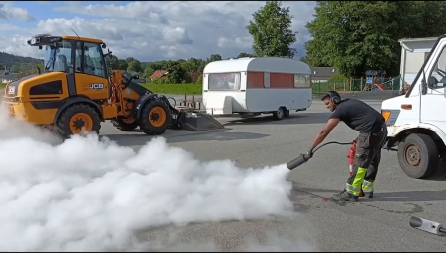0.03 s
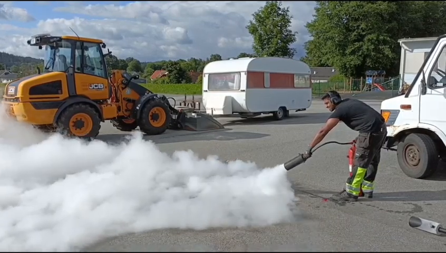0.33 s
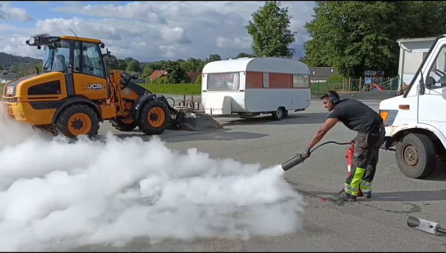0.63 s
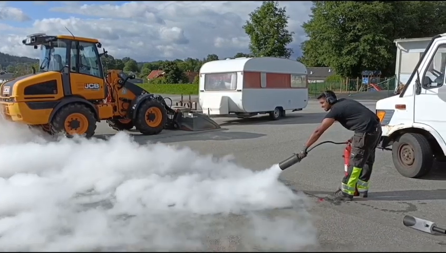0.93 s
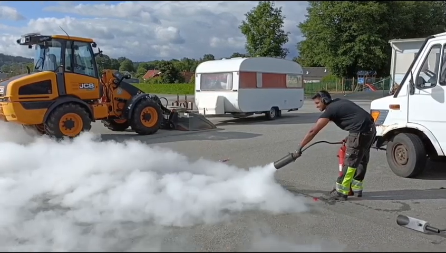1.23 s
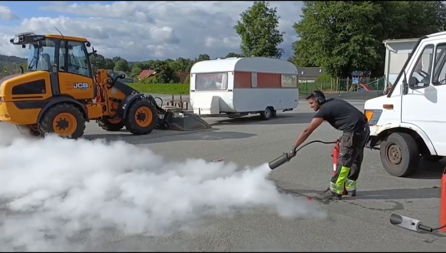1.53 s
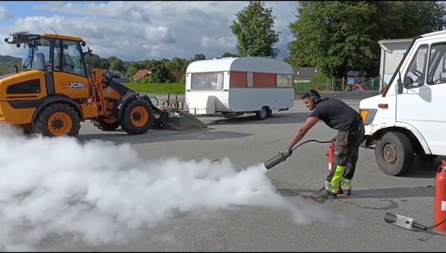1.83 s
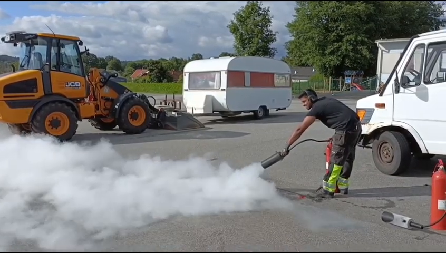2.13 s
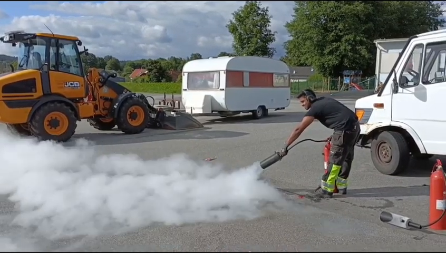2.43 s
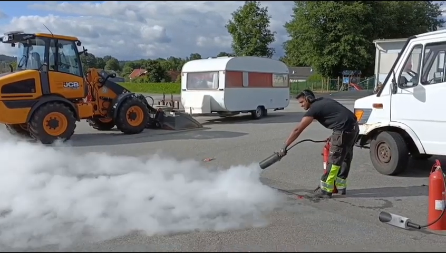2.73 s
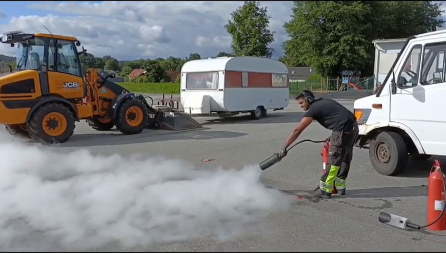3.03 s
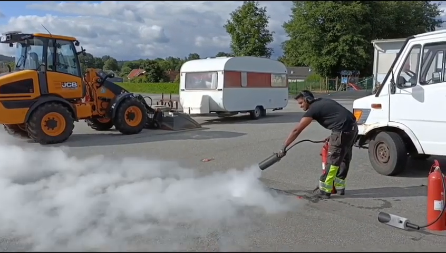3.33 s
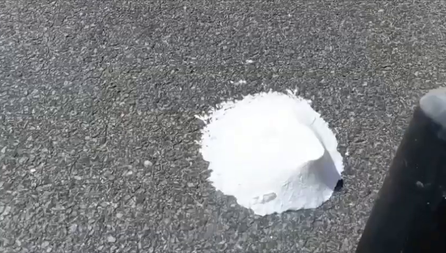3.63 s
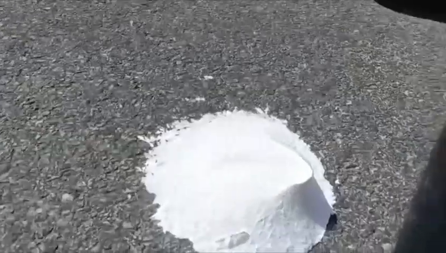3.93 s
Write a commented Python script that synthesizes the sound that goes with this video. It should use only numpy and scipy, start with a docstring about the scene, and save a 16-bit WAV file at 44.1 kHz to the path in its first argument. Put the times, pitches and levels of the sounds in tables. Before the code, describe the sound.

A fire extinguisher blasts gas from the start, a loud steady hiss a few metres away on an outdoor paved lot. Its low roar gradually fades while the hiss turns shriller. Brief whistles and screeches come near 0.8 seconds and between 1.5 and 2.5 seconds. At about 3.6 seconds the blast cuts off. A soft bump follows at 3.7 seconds, then faint air and wind on the microphone.

```python
"""On a paved lot, a carbon dioxide fire extinguisher blasts gas through its horn a few metres away. The
swirling gas makes a low roar that fades, while most of the horn's resonances rise and grow stronger. The nozzle
adds a shrill band near 5 kHz, screeches and brief whistles; hard surfaces echo it all. The sound stops
abruptly. After a short silence come a soft bump and quiet air with a little wind."""
import sys
import numpy as np
from scipy import signal
from scipy.fft import rfft, irfft, next_fast_len
from scipy.io import wavfile
from scipy.ndimage import map_coordinates

SR = 44100
rng = np.random.default_rng(int(sys.argv[2]) if len(sys.argv) > 2 else 0)


def persist_wave(psi):
    """Save psi, clipped to +-1, as 16-bit WAV."""
    counts = np.round(np.clip(psi, -1, 1) * 32767).astype(np.int16)
    wavfile.write(sys.argv[1], SR, np.atleast_2d(counts).T)


N = 176400
STOP_S = 3.633  # the sound stops abruptly here


def amp(db):
    """Turn decibels into a gain."""
    return 10 ** (np.asarray(db) / 20)


def along(points, hz):
    """Read between (pitch_hz, value) points on a log pitch scale."""
    pitches, values = np.transpose(points)
    return np.interp(np.log(hz + 1), np.log(pitches + 1), values)


def clock():
    """The time of each sample in seconds."""
    return np.arange(N) / SR


def level(points):
    """A gain for each sample from (time_s, level_db) points."""
    return amp(np.interp(clock(), *np.transpose(points)))


def bell(distance, width):
    """A smooth hump of height 1 and the given width at half height."""
    return .5 ** ((2 * distance / width) ** 2)


def decay(t, fade_s):
    """A fall of 60 dB in fade_s seconds, silent before t = 0."""
    return (t >= 0) * np.exp(-np.log(1000) * np.maximum(t, 0) / fade_s)


def wobble(per_s):
    """A smooth curve through per_s random values a second."""
    return map_coordinates(rng.standard_normal(N // 10), [clock() * per_s], mode="wrap")


# How two microphones hear each pitch: pitch_hz, left_minus_right_db, likeness (0 to 1), left_lead_rad
STEREO = [(40, -4.5, .5, 2), (110, -3.5, 0.9, 0.2), (180, 1, 1, -0.12), (381, -4, 0.8, -0.37),
          (586, 0, 0.7, -0.24), (756, 9, 0.08, 0.4), (893, -3.5, 0.23, 0.7), (1300, 0, .85, 0.43),
          (1610, -2.5, 0.8, -0.4), (2050, -2.5, 0.83, -0.56), (2600, -3, 0.4, 0), (3080, 5, 0.2, -.8),
          (3570, 1, 0.4, 1.5), (4600, -5.5, 1, 1.3), (5160, -4.5, 0.7, 1.5), (5700, -2, 0.3, -0.3),
          (6450, 6, 0.2, -2.5), (7600, 3.5, 0.2, 0.9), (8800, -7, 0, -0.2), (10500, -1, 0, -0.034),
          (15000, -2.5, .05, 0)]
def stereo(hz):
    """Balance, likeness and phase lead between left and right at a pitch."""
    return [along(np.array(STEREO)[:, [0, column]], hz) for column in (1, 2, 3)]


def noise(colour, crackle=0):
    """Steady stereo noise; colour(hz, s), in dB, shapes its tone but not its level."""
    white = rng.standard_normal((2, N))
    white[0] = (white[0] + crackle) / np.sqrt(1 + np.mean(np.square(crackle)))
    frames = dict(nperseg=4096, noverlap=3072)
    hz, s, (common, apart) = signal.stft(white, SR, **frames)
    hz = hz[:, None]
    gain = amp(colour(hz, s))
    gain /= np.sqrt(np.mean(gain ** 2, axis=0))
    pan_db, likeness, lead = stereo(hz)
    turn = np.arccos(np.clip(likeness, 0, 1)) / 2
    mid, side = np.cos(turn) * common, np.sin(turn) * apart
    left = amp(pan_db / 2) * np.exp(1j * lead / 2)
    pair = np.array([(mid + side) * left, (mid - side) / left])
    mono_level = np.hypot(np.cos(turn) * abs(left + 1 / left), np.sin(turn) * abs(left - 1 / left)) / 2
    return signal.istft(pair * gain / mono_level, SR, **frames)[1][:, :N]


# Loudness of the outdoor air and of the wind: time_s, level_db
AIR_LEVEL = [(3.72, -67), (3.8, -67), (3.92, -63), (4.0, -60)]
WIND_LEVEL = [(3.72, -61), (3.75, -59), (3.775, -65), (3.82, -60.5), (3.86, -55), (3.9, -55), (3.95, -64),
              (4.0, -66)]
# Tone of each: pitch_hz, relative_db
AIR_TONE = [(88, -30), (150, -5), (409, -6), (818, -11), (1030, -14), (1490, -14.5), (4210, -22.5),
            (14200, -29), (15000, -22)]
WIND_TONE = [(25, -14), (55, 7), (110, 3), (170, -18), (300, -14), (900, -60)]
def air_and_wind(start_s=3.715, fade_in_s=.006):
    """Faint outdoor air, with wind rumbling on the microphones."""
    air = level(AIR_LEVEL) * noise(lambda hz, s: along(AIR_TONE, hz))
    wind = level(WIND_LEVEL) * noise(lambda hz, s: along(WIND_TONE, hz))
    return (air + wind) * np.clip((clock() - start_s) / fade_in_s, 0, 1)


# Tone of the bump: pitch_hz, relative_db
BUMP_TONE = [(60, -8), (200, 2), (600, 6), (1100, -8), (1900, -3), (2700, -26), (5000, -42), (10000, -48)]
def bump(start_s=3.729, thud_s=3.743, thud_hz=122):
    """A hand bumps the case that holds the microphones, and it answers with a low thud."""
    knock = amp(-47) * decay(clock() - start_s, fade_s=.053) * noise(lambda hz, s: along(BUMP_TONE, hz))
    t = clock() - thud_s
    thud = amp(-45) * decay(t, fade_s=.1) * np.sin(2 * np.pi * thud_hz * t)
    return knock + thud


# Echoes off parked vehicles and the ground: left_delay_s, right_delay_s, relative_db
ECHOES = [(.0061, 0.0053, -18.5), (.0098, 0.0078, -25), (0.019, 0.02, -16.5), (0.0187, 0.023, -15),
          (.0243, 0.018, -22), (0.033, 0.042, -23)]
def add_echoes(sound):
    """Hard surfaces send back weak, late copies of the sound."""
    total = sound.copy()
    for *delays, db in ECHOES:
        for side, delay_s in enumerate(delays):
            total[side] += amp(db) * np.roll(sound[side], round(delay_s * SR))
    return total


# Loudness of the nozzle's ring: time_s, level_db
RING_LEVEL = [(0, -38), (.16, -33.5), (.55, -31), (.72, -29), (.86, -28), (.98, -34), (1.4, -45),
              (1.57, -31.5), (1.75, -42), (2.05, -34), (2.4, -30), (2.6, -39.5), (3.0, -41.5), (3.2, -31),
              (3.4, -37.5), (3.6, -42.5)]
# Its tone: pitch_hz, relative_db
RING_TONE = [(2400, -44), (2900, -16.5), (3050, 1), (3220, 1), (3400, -9), (3750, -19), (4400, -45.5)]
def ring():
    """The nozzle rings raggedly near 3.1 kHz."""
    return level(RING_LEVEL) * noise(lambda hz, s: along(RING_TONE, hz))


# Rough screeches: peak_s, length_s, pitch_hz, width_hz, level_db
SCREECHES = [(1.52, .22, 4980, 330, -32), (1.75, .12, 5050, 280, -30), (2.24, .2, 5100, 450, -27),
             (2.42, .4, 2100, 100, -32)]
def screeches():
    """Narrow bands of noise swell for a moment at the nozzle's resonances."""
    total = 0
    for peak_s, length_s, pitch_hz, width_hz, db in SCREECHES:
        band = noise(lambda hz, s: -20 * np.log10(1 + (2 * (hz - pitch_hz) / width_hz) ** 2))
        total += amp(db) * bell(clock() - peak_s, length_s) * band
    return total


def ragged_tone(hz, jitter_hz=48, flutter_db=2.8, wobbles_per_s=400):
    """A stereo tone that trembles in pitch and strength."""
    phase = 2 * np.pi * np.cumsum(hz + jitter_hz * wobble(wobbles_per_s)) / SR
    pan_db, _, lead = stereo(hz)
    pair = np.array([amp(side * pan_db) * np.sin(phase + side * lead) for side in (.5, -.5)])
    pair *= amp(flutter_db * wobble(wobbles_per_s))
    return pair / pair.mean(axis=0).std()


# Brief whistles: peak_s, length_s, pitch_hz, glide_hz_per_s, level_db
WHISTLES = [(.175, 0.057, 3070, -1200, -32), (.825, .09, 3040, -900, -28.5), (1.73, .06, 5100, 900, -29),
            (2.155, 0.032, 5097, -2000, -24), (2.195, .06, 4860, 0.5, -21), (2.242, .06, 5190, -900, -23.5),
            (2.302, 0.026, 4985, 3998.5, -23.5), (2.359, 0.022, 5340, 4000, -26),
            (2.482, 0.037, 4950, 6498.5, -27.5)]
def whistles():
    """The nozzle locks onto one gliding pitch for a moment, then hops to the next."""
    t = clock()
    peak_s, length_s, hz, glide, db = np.transpose(WHISTLES)
    gains = amp(db)[:, None] * bell(t - peak_s[:, None], length_s[:, None])
    loudest = gains.argmax(axis=0)
    from_peak_s = np.clip(t - peak_s[loudest], -length_s[loudest], length_s[loudest])
    return gains.max(axis=0) * ragged_tone(hz[loudest] + glide[loudest] * from_peak_s)


# Pitches the horn and nozzle favour: start_hz, end_hz, width_hz, start_boost_db, end_boost_db
RESONANCES = [(159.4, 195, 19, 15, 12), (504, 574.5, 62, 7, 18), (848, 939, 57, 6.5, 16),
              (1213, 1310, 210, 10.5, 0.5), (1366, 1438, 70, 5.5, 7), (1484, 1695, 100.3, 6, 3),
              (1740, 1895, 59, 1, 12), (2004, 2143, 115, 6, 6), (2420, 2490, 190, 3.5, 9),
              (3040, 3020, 190, -0.5, 9.5), (4540, 4630, 140, 1, 4), (5742, 5710, 86, 2.5, 7.5),
              (9450, 9400, 220, 3, 0.5), (14900, 14900, 330, 8, -6)]
def horn(hz, s):
    """The boost in dB from resonances that drift and change strength during the blast."""
    progress = np.clip(s / STOP_S, 0, 1)
    late = progress ** 1.33  # strength changes faster near the end
    return sum((db0 + (db1 - db0) * late) * bell(hz - hz0 - (hz1 - hz0) * progress, width)
               for hz0, hz1, width, db0, db1 in RESONANCES)


def shocks(per_s=330, strength=.18):
    """Small shocks in the jet crackle as sharp spikes of uneven size."""
    spikes = (rng.random(N) < per_s / SR) * (1 + rng.random(N))
    return strength * spikes / spikes.std()


def jet_band(tone, levels, crackle=0, *, swirl_db, swirls_per_s):
    """One band of the jet's noise, coloured by the horn and shaken by its own swirls."""
    band = noise(lambda hz, s: along(tone, hz) + horn(hz, s), crackle)
    return band * level(levels) * amp(swirl_db * wobble(swirls_per_s))


# Loudness of the horn's drone (100-350 Hz) and the jet's roar (350-1050 Hz): time_s, relative_db
DRONE_LEVEL = [(0, -35), (.25, -30), (.8, -36), (1.2, -37.5), (1.6, -37.5), (2.1, -40), (2.7, -45),
               (3.1, -45.5), (3.6, -42)]
ROAR_LEVEL = [(0, -31.5), (.22, -28), (.85, -33.5), (1.501, -33), (2.2, -34), (2.8, -38.5), (3.602, -38)]
# Tone of each: pitch_hz, relative_db
DRONE_TONE = [(25, -45), (45, -33.5), (62, -26), (80, -20), (110, -11), (160, -2.5), (215, 1.5),
              (315, -1.5), (370, -10.5), (520, -34), (1200, -70.5)]
ROAR_TONE = [(120, -51), (280, -16), (385, -9.5), (470, -4.5), (630, 0.5), (725, -10), (790, -2),
             (1050, -6.5), (1400, -23), (3000, -73.5)]
def low_roar():
    """The gas drones and roars through the horn, loudest near the start."""
    drone = amp(-.4) * jet_band(DRONE_TONE, DRONE_LEVEL, swirl_db=1.6, swirls_per_s=40)
    roar = amp(-.5) * jet_band(ROAR_TONE, ROAR_LEVEL, swirl_db=.5, swirls_per_s=30)
    return drone + roar


# Loudness of the rush (1-4 kHz), shrill band (near 5 kHz) and fine hiss above: time_s, relative_db
RUSH_LEVEL = [(0, -20.5), (.35, -20), (.85, -21), (1.0, -21), (1.351, -21), (1.5, -20.5), (1.7, -21.5),
              (2.05, -22.5), (2.3, -22.5), (2.5, -23), (2.749, -24.5), (3.05, -23.5), (3.6, -23.5)]
SHRILL_LEVEL = [(0, -28.5), (.6, -26.5), (1.1, -25), (1.499, -23), (1.75, -22.5), (2.05, -21.5),
                (2.251, -21), (2.601, -21), (3.0, -22.5), (3.349, -21.5), (3.6, -22)]
HISS_LEVEL = [(0, -28), (.5, -27), (.8, -27), (1.0, -28), (1.5, -26), (1.7, -27), (2.0, -25.5), (2.22, -24),
              (2.399, -25.5), (2.7, -25.5), (3.6, -25.5)]
# Tone of each: pitch_hz, relative_db
RUSH_TONE = [(600, -57), (1000, -18), (1200, -7), (1500, 0), (1780, -2.5), (2100, 0.5), (2300, -2),
             (2550, -2.5), (2750, -2.5), (3400, -2.5), (3850, -7), (4200, -3.5), (4600, -11.5), (6000, -48)]
SHRILL_TONE = [(2800, -45.5), (3500, -14), (3900, -13), (4200, -6), (4550, -1.5), (5050, 1), (5400, -1),
               (5800, -5.5), (6300, -22.5), (8000, -53)]
HISS_TONE = [(4000, -30), (5600, -7), (6200, 0.5), (7000, -2), (7800, -5.5), (8800, -5.5), (9450, -5.5),
             (10100, -10), (10900, -10), (11500, -7), (12800, -12), (13900, -12.5), (14900, -10.5),
             (15400, -15)]
def spray(crackle):
    """The escaping gas rushes, shrills and hisses, with the same crackle in all three bands."""
    rush = amp(-1.5) * jet_band(RUSH_TONE, RUSH_LEVEL, crackle, swirl_db=.57, swirls_per_s=30)
    shrill = amp(-1.73) * jet_band(SHRILL_TONE, SHRILL_LEVEL, crackle, swirl_db=.66, swirls_per_s=90)
    hiss = amp(-.42) * jet_band(HISS_TONE, HISS_LEVEL, crackle, swirl_db=.5, swirls_per_s=80)
    return rush + shrill + hiss


def extinguisher(sputter_db=.5, churn_db=.38, flutter_db=.4):
    """The whole jet churns and its high sounds sputter; then the sound stops abruptly, leaving a short tail."""
    crackle = shocks()
    lows = low_roar()
    highs = spray(crackle) + ring() + screeches() + whistles()
    highs *= amp(sputter_db * wobble(per_s=600))
    turbulence = amp(churn_db * wobble(per_s=19) + flutter_db * wobble(per_s=65))
    since_stop_s = np.maximum(clock() - STOP_S, 0)
    gate = decay(since_stop_s, fade_s=.0072)
    tail = amp(-14.5) * decay(since_stop_s, fade_s=.036)
    return add_echoes((lows + highs) * turbulence) * np.maximum(gate, tail)


def scene():
    """The blast, then the quiet lot and a bump."""
    return extinguisher() + air_and_wind() + bump()


def record(dry, top_hz=15350, slope_hz=200):
    """Cut away the very highest treble."""
    size = next_fast_len(N + SR)
    keep = np.clip((top_hz - np.fft.rfftfreq(size, 1 / SR)) / slope_hz, 0, 1)
    return irfft(rfft(dry, size) * keep, size)[:, :N]


dry = scene()
out = record(dry)
persist_wave(out)
```